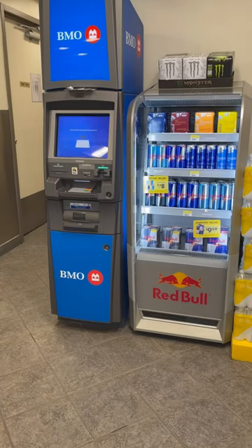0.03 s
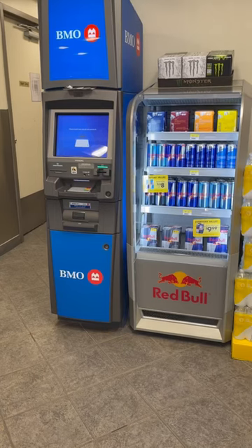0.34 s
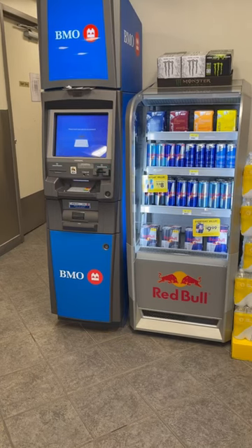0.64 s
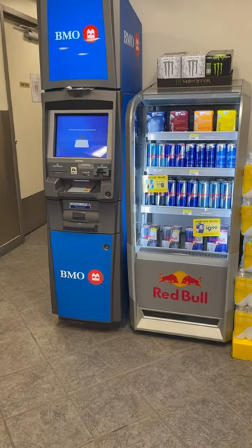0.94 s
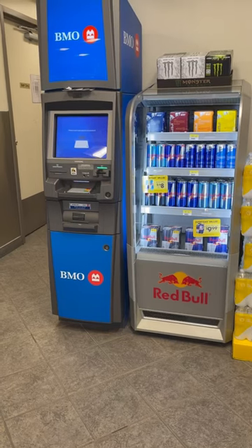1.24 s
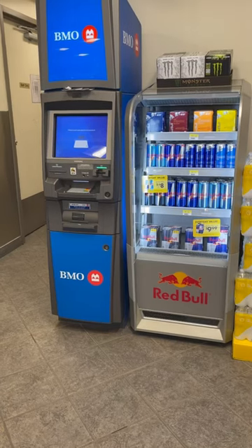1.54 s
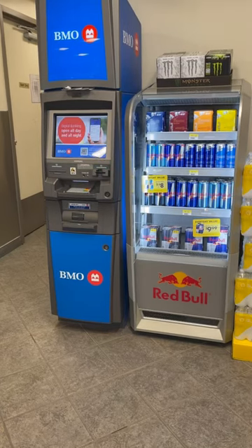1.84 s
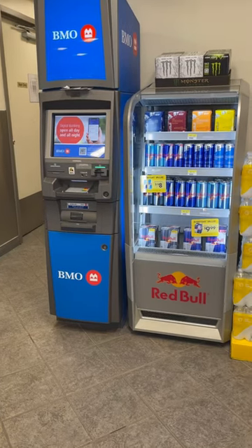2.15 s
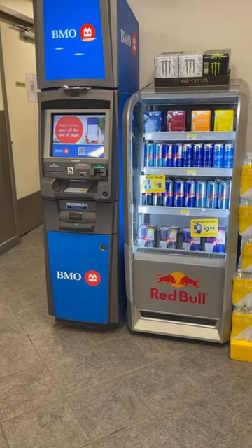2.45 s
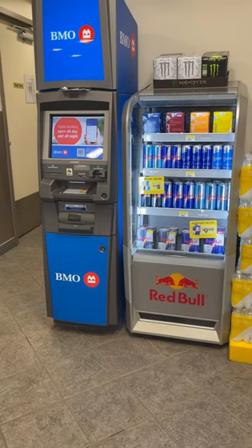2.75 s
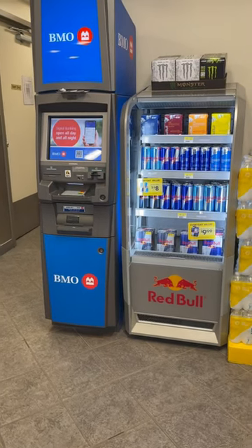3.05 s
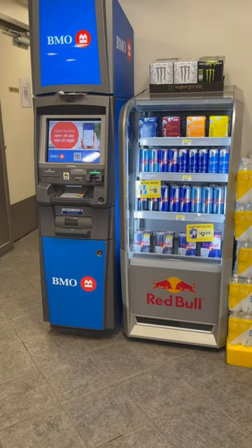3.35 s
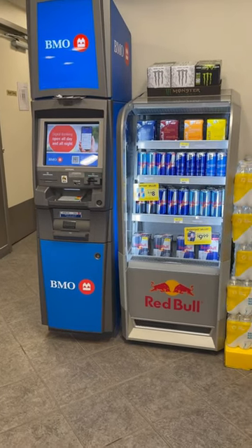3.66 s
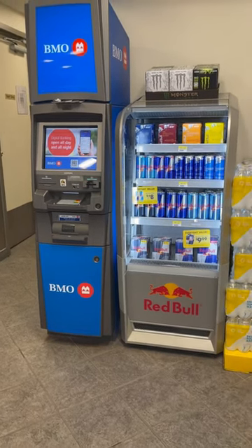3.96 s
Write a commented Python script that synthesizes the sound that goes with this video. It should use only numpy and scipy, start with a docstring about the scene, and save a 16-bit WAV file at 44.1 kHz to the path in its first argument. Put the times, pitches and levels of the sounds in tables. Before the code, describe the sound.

A drinks cooler hums in a shop for the whole four seconds, slightly to the right. Its pulsing drone sits over an uneven low compressor throb, thin fluttering fan whines and a steady rush of air. A few faint, soft rustles pass at about 1.1 and 1.5 seconds. The hum creeps up a little in level, swelling most near 2.8 seconds, and carries on to the end.

```python
"""Open drinks cooler in a shop

A pulsing drone leads: mains hum beating against two fans. Under it the compressor throbs just below
mains speed, the cabinet whines, and a five-bladed fan wobbles so that its upper tones flutter.
Air rushes through the grille, and a few faint rustles pass in the first half."""
import sys
import numpy as np
from scipy import signal
from scipy.fft import rfft, irfft
from scipy.io import wavfile

SR = 44100
rng = np.random.default_rng(int(sys.argv[2]) if len(sys.argv) > 2 else 0)


def int16_out(signal):
    """Quantize to a 16-bit WAV file."""
    q = np.round(np.clip(np.atleast_2d(signal).T, -1, 1) * 32767)
    wavfile.write(sys.argv[1], SR, q.astype(np.int16))


N = 176400

MAINS_HUM_HZ, COMPRESSOR_HZ = 119.97, 59.2
SHAFT_HZ, BLADES = 24.554, 5
WOBBLE_HZ, WOBBLE_PEAK_S = 2.45, .26
WOBBLE_SHARE, DRIFT_SHARE = .0016, .00012  # of the fan's speed
DRONE_PEAK_S, DRONE_RISE_DB_PER_S = 2.762, .45

# Levels are set ahead of each layer's trim and the cooler's fader.
# Beating trio (twice the mains hum, a second fan, twice the blade rate): pitch_hz, level_db
DRONE_TONES = [(239.93, -45), (243.8, -48), (245.54, -40.2)]
# Envelope of the compressor's throb: time_s, level_db
THROB_ENVELOPE = [(0.08, -38.5), (0.14, -41.5), (0.62, -42), (0.85, -40), (1.03, -39.5), (1.25, -48),
                  (1.54, -37), (1.84, -39.5), (1.92, -61), (1.97, -44), (2.39, -36.5), (2.51, -51),
                  (2.58, -36), (2.68, -47), (2.9, -38.5), (3.07, -34.5), (3.37, -43), (3.57, -43),
                  (3.65, -41), (3.84, -38.5), (4.0, -42)]
# Mains harmonics of the motors: hum_multiple, level_db
HUM_HARMONICS = [(1, -47), (3, -49), (4, -54.5), (5, -63), (6, -68.5), (8, -73), (9, -78), (10, -73),
                 (12, -74.5), (13, -87)]
# Steady whines of the cabinet: pitch_hz, level_db
CABINET_WHINES = [(283.5, -51.5), (301.3, -53), (689.4, -68.5), (731.8, -59.5), (1777.7, -80)]
# Harmonics of the passing blades: blade_rate_multiple, level_db
BLADE_HARMONICS = [(1, -58.5), (3, -58), (4, -53.5), (5, -59.5), (9, -68.5), (10, -61), (11, -71.5),
                   (12, -63.5), (13, -62.5), (15, -71), (16, -65), (17, -86.5), (18, -74.5), (19, -80)]
# Tones from unequal blades: shaft_rate_multiple, level_db
IMBALANCE_TONES = [(66, -67.5), (79, -78.5), (81, -73), (97, -75)]
# Thin, high fan whistles: pitch_hz, level_db
FAN_WHISTLES = [(3192, -84), (3684, -79), (4438, -92.5), (4839, -89), (4987, -86.5), (9558, -103.5),
                (10400, -100)]
# Centre of the air rush, common to both ears: frequency_hz, density_db
AIR_MID_SPECTRUM = [(20, -99), (27, -80.5), (43, -72), (53, -61), (60, -68), (68, -67), (110, -60),
                    (147, -68), (183, -65), (222, -66.5), (260, -62), (322, -61), (380, -72), (465, -69),
                    (530, -75), (620, -75.5), (660, -79), (850, -83.5), (1450, -86), (1750, -89.5),
                    (2150, -90), (2700, -97.5), (3400, -96), (4400, -103), (5100, -101), (6700, -110),
                    (7600, -130), (8700, -115), (10300, -110), (12400, -116), (13500, -135), (16000, -150)]
# Width of the air rush, opposite in the two ears: frequency_hz, density_db
AIR_SIDE_SPECTRUM = [(20, -112), (60, -99), (160, -102), (240, -84.5), (330, -78.5), (420, -82.5),
                     (560, -80.5), (900, -88.5), (1450, -91.5), (1900, -102), (2450, -93), (3100, -96.5),
                     (4000, -106), (4700, -104), (5500, -109), (7000, -104.5), (9300, -111), (11000, -126),
                     (13500, -117), (16000, -122)]
# Flicker of the rush, restless in the rumble and smooth in the hiss: frequency_hz, depth_db
AIR_FLICKER_DEPTH = [(100, .8), (1000, .7), (3000, .3)]
# Faint rustles: peak_s, rise_s, fall_s, gain_db, tilt_db_per_octave
RUSTLE_CUES = [(1.06, 0.079, 0.093, -10, -3), (1.131, 0.0076, 0.044, -5.5, 5),
               (1.459, 0.07, .13, -11.5, -6.5)]
# Tone colour of a rustle before its tilt: frequency_hz, density_db
RUSTLE_SPECTRUM = [(1000, -112), (3000, -91.5), (5500, -90.5), (7500, -110), (10000, -102), (12500, -106),
                   (13600, -135)]
# Pan that sets the cooler a little to the right: frequency_hz, left_minus_right_db
COOLER_PAN = [(60, 0), (200, -1.9), (600, -2.8), (1200, -1.6), (2500, 0)]
# Slow fader ride on the whole cooler: time_s, gain_db
COOLER_FADER = [(0, -3), (.7, -1.44), (1.5, -0.5), (2.3, -0.43), (3.0, 0.3), (4, 0.27)]


def drone(t):
    """Three close tones beat, slowly and quickly at once, and grow; they swell most as all fall in step."""
    from_peak_s = t - DRONE_PEAK_S
    trim_db = .6 + DRONE_RISE_DB_PER_S * from_peak_s
    return sum(tone(hz, db + trim_db, from_peak_s, waver_db=.4, in_step=True) for hz, db in DRONE_TONES)


def compressor(t):
    """The low end: one tone just under mains speed, throbbing unevenly."""
    throb_db = np.interp(t, *np.array(THROB_ENVELOPE).T)
    return tone(COMPRESSOR_HZ, throb_db + .4, t, waver_db=.3)


def mains_hum(t):
    """The motors hum in a harmonic stack locked to the mains."""
    return sum(tone(k * MAINS_HUM_HZ, db, t, waver_db=.7) for k, db in HUM_HARMONICS)


def cabinet(t):
    """The cabinet whines at fixed pitches, each wavering in level."""
    return sum(tone(hz, db + 1.1, t, waver_db=1.14) for hz, db in CABINET_WHINES)


def fan(t):
    """Blade tones, shaft tones and whistles all bend with one slightly wobbling fan speed."""
    wobble = WOBBLE_SHARE * np.cos(2 * np.pi * WOBBLE_HZ * (t - WOBBLE_PEAK_S))
    speed = 1 + wobble + DRIFT_SHARE * wander(.63)
    clock = np.cumsum(speed) / SR
    blades = [(k * BLADES * SHAFT_HZ, db) for k, db in BLADE_HARMONICS]
    shaft = [(k * SHAFT_HZ, db) for k, db in IMBALANCE_TONES]
    return sum(tone(hz, db, clock, waver_db=.5) for hz, db in blades + shaft + list(FAN_WHISTLES))


def air_rush():
    """A bed of turbulent air from the grille: octave bands flicker alone and swell together."""
    hz = np.arange(N // 2 + 1) * SR / N
    ears = np.array([[1], [-1]])
    stereo_noise = noise(AIR_MID_SPECTRUM) + ears * noise(AIR_SIDE_SPECTRUM)
    pan = undb(ears * curve_at(COOLER_PAN, hz) / 2)
    spectrum = rfft(stereo_noise) * pan * reflections(hz, count=36)
    octave = np.log2(np.maximum(hz, 1))
    rush = 0
    for k in range(4, 15):  # bands centred from 16 Hz to 16 kHz
        band = irfft(spectrum * np.maximum(1 - abs(octave - k), 0), N)
        flicker_db = curve_at(AIR_FLICKER_DEPTH, 2 ** k) * wander(6.5)
        rush = rush + band * undb(flicker_db)
    swell_db = .4 * wander(3.7)
    return rush * undb(swell_db)


def reflections(hz, count):
    """Short echoes off walls and floor comb a fine ripple into the treble; mean power stays 1."""
    gain = .092 * hz / (hz + 2700)
    delays_s = rng.uniform(.00198, .035, count)
    echoes = sum(np.exp(-2j * np.pi * hz * delay) for delay in delays_s)
    return (1 + gain * echoes) / np.sqrt(1 + count * gain ** 2)


def rustles(t):
    """Soft brushes of bright noise that swell and die away, dead centre."""
    out = 0
    for peak_s, rise_s, fall_s, gain_db, tilt in RUSTLE_CUES:
        colour = [(hz, db + tilt * np.log2(hz / 5000)) for hz, db in RUSTLE_SPECTRUM]
        envelope = np.exp(np.minimum((t - peak_s) / rise_s, (peak_s - t) / fall_s))
        out = out + undb(gain_db) * envelope * noise(colour)
    return out


def tone(hz, db, clock, waver_db, in_step=False):
    """A panned sine that wavers in level; tones in step crest together when the clock reads 0."""
    random_phase = rng.uniform(0, 2 * np.pi)
    phase = 0 if in_step else random_phase
    ear_spread = rng.choice([-1, 1]) * .25 * hz / 1000  # 0.25 rad per kHz between the ears
    ears = np.array([[.5], [-.5]])
    gain = undb(db + waver_db * wander(2.3) + ears * curve_at(COOLER_PAN, hz))
    return np.sqrt(2) * gain * np.cos(2 * np.pi * hz * clock + phase + ears * ear_spread)


def noise(colour):
    """Noise shaped to a curve of frequency_hz, density_db."""
    hz = np.arange(N // 2 + 1) * SR / N
    white = rfft(rng.standard_normal(N))
    return irfft(white * undb(curve_at(colour, hz)), N) * np.sqrt(SR / 2)


def wander(rate_hz):
    """A smooth random modulator with a spread of 1, moving about rate_hz times a second."""
    hz = np.arange(N + 1) * SR / (2 * N)
    white = rfft(rng.standard_normal(2 * N))
    smooth = irfft(white * np.exp(-(hz / rate_hz) ** 2))
    return smooth[:N] / smooth.std()


def curve_at(table, hz):
    """Read a curve on a log-frequency axis."""
    points_hz, values = np.array(table, float).T
    return np.interp(np.log(np.maximum(hz, 1)), np.log(points_hz), values)


def undb(db):
    """Decibels to gain."""
    return 10 ** (np.asarray(db) / 20)


def scene():
    """The cooler's layers creep up on one fader; the rustles sit outside it."""
    t = np.arange(N) / SR
    cooler = compressor(t) + mains_hum(t) + cabinet(t) + drone(t) + fan(t) + air_rush()
    fader_db = np.interp(t, *np.array(COOLER_FADER).T)
    return cooler * undb(fader_db) + rustles(t)


def record(dry):
    """Master: 35 ms of silence, a 3 ms fade-in and a steep high cut at 15.5 kHz."""
    fade_in = np.clip((np.arange(N) / SR - .035) / .003, 0, 1)
    high_cut = signal.ellip(8, .2, 70, 15500, fs=SR, output="sos")
    return signal.sosfilt(high_cut, dry * fade_in)


dry = scene()
out = record(dry)
int16_out(out)
```